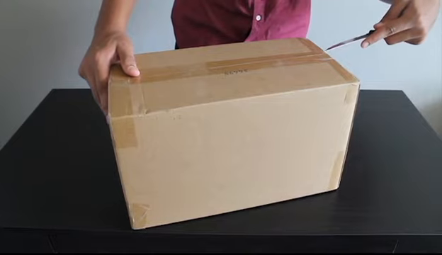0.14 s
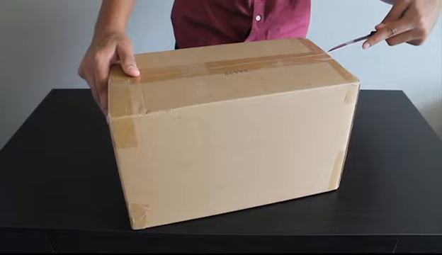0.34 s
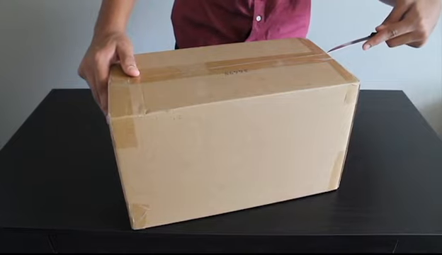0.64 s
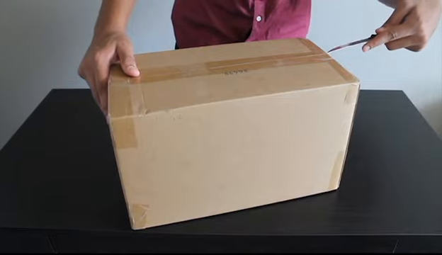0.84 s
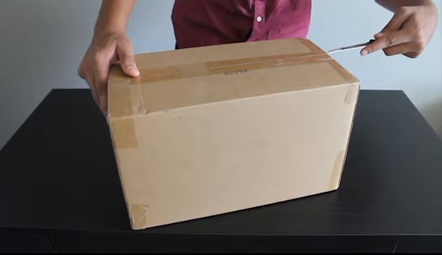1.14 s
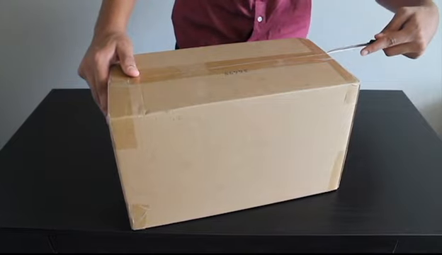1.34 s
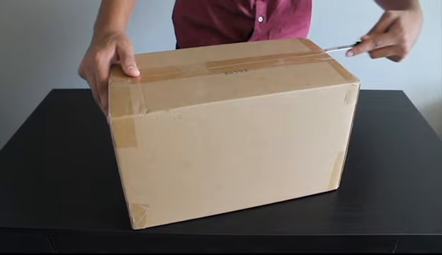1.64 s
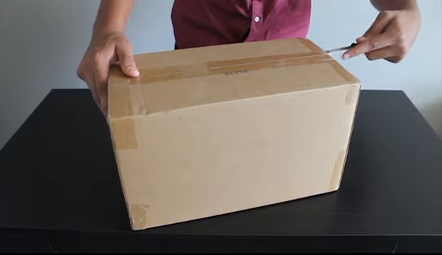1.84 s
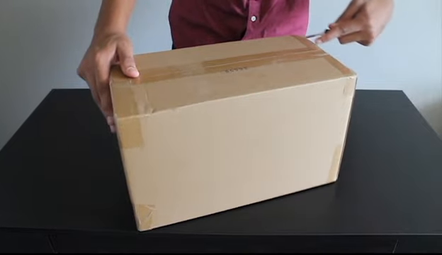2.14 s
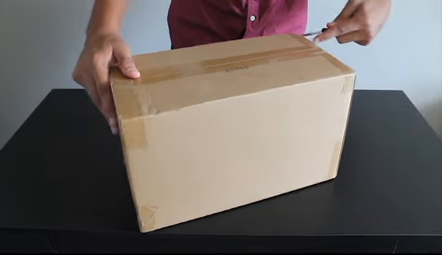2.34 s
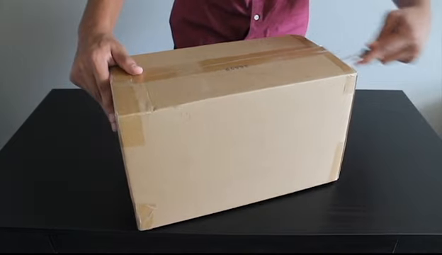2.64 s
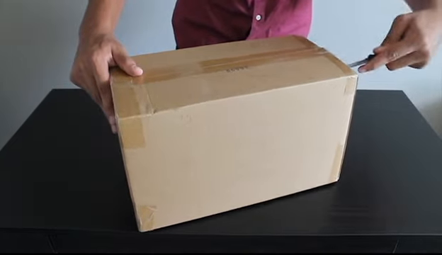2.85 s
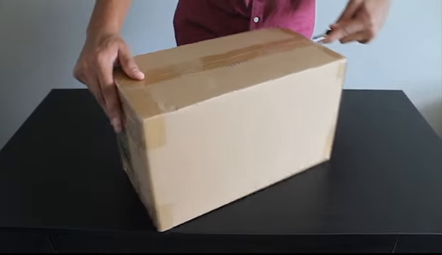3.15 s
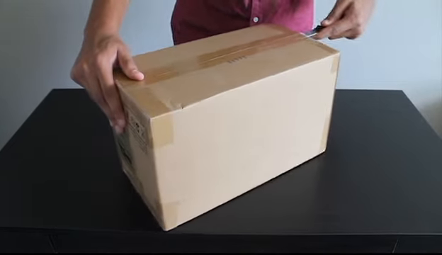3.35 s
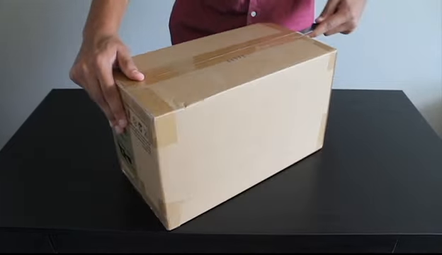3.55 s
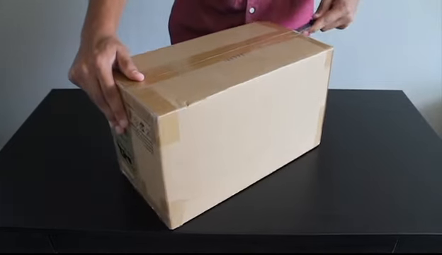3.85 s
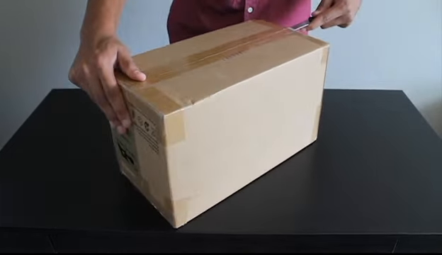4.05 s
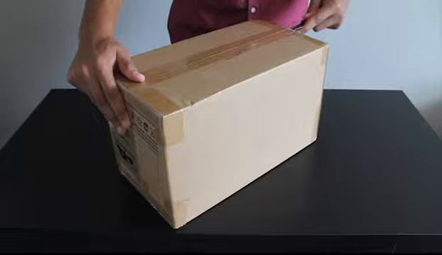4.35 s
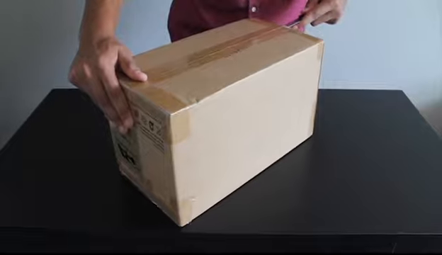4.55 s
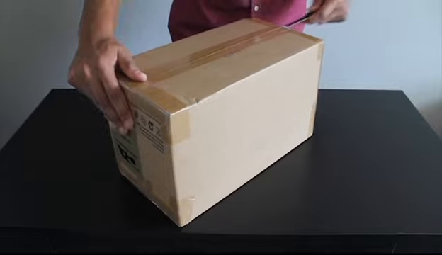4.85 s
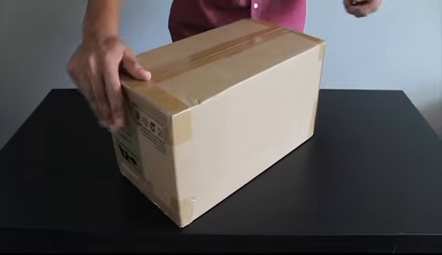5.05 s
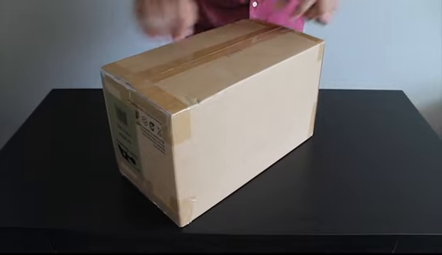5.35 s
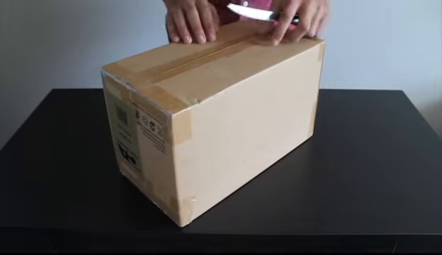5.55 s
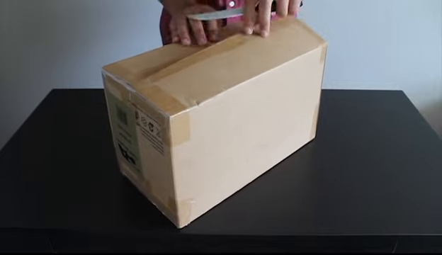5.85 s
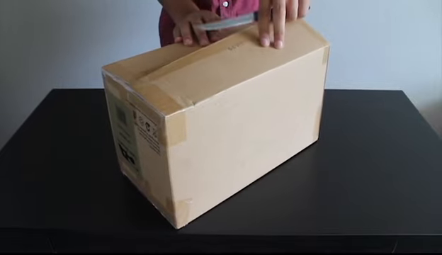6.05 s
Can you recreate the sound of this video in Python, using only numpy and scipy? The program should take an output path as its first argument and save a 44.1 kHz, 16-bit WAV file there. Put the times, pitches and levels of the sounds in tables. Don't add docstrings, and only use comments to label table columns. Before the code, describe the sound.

Sharp tape pops and gritty blade strokes on a cardboard carton, scattered taps, then a loud crack and hollow slap as the flap comes free.

```python
import sys
import numpy as np
from scipy import signal
from scipy.fft import rfft, irfft
from scipy.io import wavfile
from scipy.ndimage import uniform_filter1d

SR = 44100
rng = np.random.default_rng(int(sys.argv[2]) if len(sys.argv) > 2 else 0)


def gain_from_decibels(decibels):
    exponent = np.asarray(decibels, float) / 20
    return 10 ** exponent


def digitize_waveform(pressure):
    field = np.atleast_2d(pressure).T
    bounded = np.clip(field, -1, 1)
    quanta = np.round(bounded * 32767).astype(np.int16)
    wavfile.write(sys.argv[1], SR, quanta)


N = 273420

# peak_s, rise_s, fall_s, pressure_db, tearing_db (over the pressure)
CUTS = [(.605, .04, 0.058, -46, -4), (.672, 0.086, 0.061, -40, -2.5), (1.075, 0.11, 0.25, -48, -6),
        (1.509, 0.038, 0.07, -40, -13), (1.54, 0.067, 0.021, -41, -6.5), (1.624, 0.043, .04, -32.5, -8.5),
        (1.68, 0.032, 0.04, -42, 7.5), (1.73, 0.12, 0.088, -42.5, -25), (1.956, .05, 0.056, -46, 0.5),
        (1.989, .05, 0.031, -40, -10), (3.485, 0.081, 0.11, -48.5, -4), (3.87, 0.074, 0.088, -44.5, -15),
        (5.896, 0.021, 0.077, -47.5, -7)]
# peak_s, rise_s, fall_s, pressure_db, rasp_db (over the pressure)
DRAGS = [(.63, 0.04, 0.042, -55.5, 10), (.965, 0.27, 0.065, -50, -28), (1.95, 0.05, 0.037, -55, 4),
         (2.02, 0.018, 0.058, -36.5, -28), (2.11, 0.099, 0.22, -52, -11), (2.71, 0.21, 0.064, -49.5, -3),
         (3.3, 0.15, 0.094, -47.5, -4.5), (3.488, 0.054, 0.088, -54.5, 9), (4.23, 0.066, 0.062, -53, -16),
         (4.86, 0.14, 0.15, -50.5, -5), (4.935, 0.042, 0.12, -52, 3.5), (5.499, 0.038, 0.033, -39, -12),
         (5.631, 0.045, 0.31, -53.5, -19), (6.02, 0.027, 0.063, -39.5, -25), (6.109, .015, 0.11, -49, -3),
         (6.19, 0.12, 0.079, -49.5, -10)]
# peak_s, level_db
JOLTS = [
    (.59, -39),
    (.678, -38),
    (1.63, -53),
    (2.01, -62),
    (4.486, -47.5),
    (4.81, -45.5),
    (5.59, -45),
]
# peak_s, rise_s, fall_s, hollow_drone_db, panel_hum_db
FLEXES = [
    (.95, .12, 0.064, -51, -70),
    (1.53, 0.061, 0.035, -41.5, -55),
    (1.62, .03, 0.046, -40, -49),
    (1.965, .04, 0.045, -42, -43),
    (3.301, 0.082, .07, -40.5, -59),
    (3.5, .05, 0.12, -48, -54),
    (3.87, 0.071, 0.09, -65, -42),
    (5.07, 0.091, 0.13, -51, -60),
]
# start_s, crack_db, flap_clack_db (over the crack), panel_ring_db (over the crack)
POPS = [(.274, -26, -35, -34), (.568, -12.5, -13.5, -7), (.591, -19, -10, -15), (.671, -25, -20, -4.5),
        (1.999, -28, -14, -21), (2.04, -31.5, -20, -18), (3.921, -32, -16, -20), (4.073, -30.5, -3.5, -18),
        (4.82, -34, -1, -1), (4.887, -36, -2, -2), (4.9, -35.5, 2, 0), (5.757, -38, -9, -9)]
# start_s, force_db, hollowness_db, hardness_db (both over the force)
TAPS = [(1.598, -29.5, 1, -3), (1.613, -39, 8, 5), (1.999, -15, 0.5, -17), (2.039, -54, 5, -15),
        (3.404, -54, 15, 11), (3.913, -41, -25, -15), (4.781, -40.5, 4, -11), (4.813, -32, -16, -9),
        (4.874, -47, -12, 12), (4.923, -23, -18, 3), (4.928, -24.5, -11, -1.5), (5.487, -34.5, 6, 0.5),
        (5.61, -31, -7, -10), (5.71, -38, -22, -7), (5.892, -34.5, -14, -4), (5.999, -39, 18, 12),
        (6.005, -17, 2.5, -26), (6.105, -29.5, -22, -0.5)]
# start_s, panel_ring_db, hollow_boom_db, flap_clack_db, crack_db
SLAPS = [
    (5.2193, -50, -51, -41, -37),
    (5.2422, -15.5, -36, -1, -12.5),
    (5.2452, -3.5, -18.5, -8, -41),
    (5.265, -11.5, -10.5, -4.5, -1.5),
    (5.266, -4.5, -10.5, -0.5, -27),
    (5.2679, -15, -16, -1.5, -30),
    (5.2713, -17, -11, -17, -36),
]
# start_s, level_db, width_s
PUSHES = [
    (5.482, -18, 0.0042),
    (5.494, -24, 0.0063),
]
# start_s, level_db
LANDINGS = [
    (4.928, -28),
    (5.49, -29),
    (5.995, -33),
]

# pitch_hz, level_db, t60_s
HOLLOW = [(284, -1, 0.07), (294, 9, 0.031), (368, -1.5, 0.028), (397.6, -1.5, 0.05), (436, -3.5, 0.068)]
# pitch_hz, level_db, t60_s
PANEL = [(505.5, 4, 0.034), (572, 0, 0.033), (624, -5, 0.044), (737, -13, 0.079), (850, -16, 0.15)]
# pitch_hz, level_db, t60_s
FLAP = [(1230, -16, 0.0046), (1330, -13.5, 0.028), (1570, 4, 0.016), (1606, 3, 0.01), (1827, -1.5, 0.022),
        (2237, -0.5, 0.01), (2452, -4, 0.032)]
# pitch_hz, level_db, t60_s
CRACK = [(3040, 10, 0.0048), (3560, -16, 0.021), (4640, 14.5, 0.0034), (5440, -6, 0.0042),
         (6960, 4.5, 0.0052), (8300, -3.5, 0.0046), (9800, -12, 0.002), (12000, -7, 0.0019),
         (13500, -4, 0.0015)]
# pitch_hz, level_db, t60_s
POP = [(3620, 1, 0.0024), (5000, 7, 0.00064), (8660, 1, 0.00081), (12000, -6, 0.0015), (14900, -3, 0.0013)]
# pitch_hz, level_db, t60_s
TABLE = [(43.5, 4.5, 0.083), (64, -26, 0.1596), (88, -5, 0.12), (153, -1, 0.092)]
# pitch_hz, level_db (per Hz)
FIZZ = [(1180, -48), (2000, -8.5), (3400, -2), (4530, -11.5), (5030, -10.5), (8190, -12), (11000, -10.5),
        (15100, -28), (16000, -30)]
# pitch_hz, t60_s
ROOM = [(60, 0.43), (250, 0.28), (700, 0.46), (2000, 0.37), (6000, 0.43), (14000, 0.18)]
# pitch_hz, level_db (per Hz)
AIR = [(.3, -29), (2.5, 13), (8, 8.5), (22, -5.5), (59, -8.5), (96, -12), (163, -8), (215, -15),
       (410, -17.5), (468, -12), (610, -19), (1000, -18.5), (2500, -24), (14500, -25.5), (16500, -28.5)]
# pitch_hz, level_db (per Hz)
OWN = [(3.5, -16), (8, 2), (240, -13.5), (590, -16.5), (2600, -17.5), (11500, -18), (16500, -19)]
# time_s, pitch_hz
WHINE = [(0, 1164), (0.252, 1015), (.45, 1260), (.65, 1170), (0.901, 1264), (1.2, 1042), (1.601, 1157),
         (1.9, 1290), (2.3, 1330), (2.55, 1213), (2.95, 1194), (3.3, 1294), (3.8, 1283), (4.1, 1244),
         (4.27, 1111), (4.88, 1310), (5.1, 1187), (6.2, 1295)]

STROKE_DROP_DB, ROUND_TOP = -23, 1.23
CUT_RASP_DB, DRAG_FIZZ_DB, STROKE_SHUDDER_DB = -14, -23, -12.5
JOLT_RISE_S, JOLT_FALL_S = 0.04, 0.055
POP_BOOM_DB, POP_THUMP_DB = -5.5, -41
TAP_CRACK_DB, TAP_THUMP_DB = -9, -20.5
SLAP_THUMP_DB = -12.5
CLACK_SENT_DB, CRACK_SENT_DB = -3.5, 0
ECHO_S, ECHO_DB, SECOND_ECHO_DB = 0.062, -14.5, -31
AIR_DB, OWN_DB = -46.5, -56
WHINE_DB, WHINE_JITTER_HZ = -57.5, 34.9
EDGE_HZ = 15950


def evened(x):
    return x / np.sqrt(np.mean(x ** 2) + 1e-20)


def read(points, hz):
    f, value = np.transpose(points)
    return np.interp(np.log(hz + 1), np.log(f + 1), value)


def add(mix, s, sound):
    part = mix[round(s * SR):][:len(sound)]
    part += sound[:len(part)]


def coloured(x, spectrum):
    hz = np.fft.rfftfreq(len(x), 1 / SR)
    return evened(irfft(rfft(x) * gain_from_decibels(read(spectrum, hz)), len(x)))


def ring(modes, detune=0.92):
    longest_s = max(t60 for _, _, t60 in modes)
    t = np.arange(int(SR * longest_s) + SR // 500) / SR
    swing = np.zeros(len(t))
    for (hz, db, t60), shift in zip(modes, detune * np.ones(len(modes))):
        swing += gain_from_decibels(db - 60 * t / t60) * np.sin(2 * np.pi * hz * shift * t) / hz
    speed = np.diff(swing)
    return speed / np.linalg.norm(speed)


def driven(force, modes):
    return signal.oaconvolve(force, ring(modes))[:N]


def slips(per_s, spread_db):
    ticks = (rng.random(N) < per_s / SR) * rng.choice([-1., 1.], N)
    return evened(ticks * gain_from_decibels(spread_db * np.minimum(rng.exponential(1, N), 4)))


def pressure(s, rise_s, fall_s, top_db):
    t = np.arange(N) / SR - s
    away = np.maximum(-t / rise_s, t / fall_s)
    return gain_from_decibels(np.maximum(top_db + STROKE_DROP_DB * away ** ROUND_TOP, -140))


def strokes():
    level = np.zeros((4, N))
    for *shape, tear_db in CUTS:
        layers_db = np.array([[0], [CUT_RASP_DB], [tear_db], [STROKE_SHUDDER_DB]])
        level += pressure(*shape) * gain_from_decibels(layers_db)
    for *shape, rasp_db in DRAGS:
        layers_db = np.array([[0], [rasp_db], [rasp_db + DRAG_FIZZ_DB], [STROKE_SHUDDER_DB]])
        level += pressure(*shape) * gain_from_decibels(layers_db)
    for s, db in JOLTS:
        level[3] += pressure(s, JOLT_RISE_S, JOLT_FALL_S, db)
    level = uniform_filter1d(level, 200, axis=1)
    rub = driven(level[0] * slips(700, spread_db=1.5), HOLLOW + PANEL)
    rasp = driven(level[1] * slips(1500, spread_db=2), FLAP)
    fizz = level[2] * coloured(slips(4000, spread_db=4), FIZZ)
    shudder = driven(level[3] * slips(260, spread_db=6), TABLE)
    return rub + rasp + fizz + shudder


def flexing():
    drone, hum = np.zeros((2, N))
    for s, rise_s, fall_s, drone_db, hum_db in FLEXES:
        drone += pressure(s, rise_s, fall_s, drone_db)
        hum += pressure(s, rise_s, fall_s, hum_db)
    hollow = driven(drone * slips(900, spread_db=1), HOLLOW[:2])
    return hollow + driven(hum * slips(900, spread_db=1), PANEL)


def pops():
    return [(s, db + panel, db + panel + POP_BOOM_DB, db + clack, db, db + panel + POP_THUMP_DB)
            for s, db, clack, panel in POPS]


def taps():
    return [(s, db, db + hollow, db + hard, db + hard + TAP_CRACK_DB, db + TAP_THUMP_DB)
            for s, db, hollow, hard in TAPS]


def slaps():
    return [(*row, row[2] + SLAP_THUMP_DB) for row in SLAPS]


def hit(levels_db, crack, rattle_s, spread, luck):
    panel_db, boom_db, clack_db, crack_db, thump_db = levels_db
    near, far = np.zeros((2, SR // 2))
    parts = ((PANEL, panel_db, 0.0005), (HOLLOW, boom_db, 0.0009),
             (FLAP, clack_db, 0.0002), (TABLE, thump_db, 0.007))
    for modes, db, soft_s in parts:
        blow = np.hanning(int(3 + soft_s * 2 * SR))
        sound = signal.oaconvolve(ring(modes, 1 + spread * luck[:len(modes)]), blow)
        sound = -gain_from_decibels(db) * sound / abs(sound).max()
        add(near, 0, sound)
        add(far, 0, sound * gain_from_decibels(CLACK_SENT_DB * (modes is FLAP)))
    rattle = 0.33 * luck * np.exp(-(np.arange(len(luck)) / SR / rattle_s) ** 2)
    rattle[0] = 1
    rattle[int(0.0012 * SR)] += 0.6
    snap = np.convolve(ring(crack), rattle)
    snap = -gain_from_decibels(crack_db) * snap / abs(snap).max()
    add(near, 0, snap)
    add(far, 0, gain_from_decibels(CRACK_SENT_DB) * ring(POP) * np.linalg.norm(snap))
    return near, far


def blows():
    near, far = np.zeros((2, N))
    kinds = ((pops(), POP, 0.002, 0.015), (taps(), POP, 0.002, 0.015), (slaps(), CRACK, 0.0025, 0.004))
    for rows, crack, rattle_s, spread in kinds:
        for s, *levels_db in rows:
            luck = rng.standard_normal(SR // 100)
            heard, sent = hit(levels_db, crack, rattle_s, spread, luck)
            add(near, s, heard)
            add(far, s, sent)
    return near, far


def palm():
    t = np.arange(N) / SR
    out = np.zeros(N)
    for k, (s, db, width_s) in enumerate(PUSHES):
        out += (-1) ** k * gain_from_decibels(db) * np.exp(-((t - s) / width_s) ** 2 * 4)
    return out


def landings():
    out = np.zeros(N)
    thud = np.convolve(ring(TABLE), np.hanning(SR // 100))
    for s, db in LANDINGS:
        add(out, s, gain_from_decibels(db) * thud / abs(thud).max())
    return out


def wall_echoes(direct):
    out = np.zeros(N)
    add(out, ECHO_S, gain_from_decibels(ECHO_DB) * direct)
    add(out, 2 * ECHO_S, gain_from_decibels(SECOND_ECHO_DB) * direct)
    return out


def room(x):
    echoes = np.zeros(SR)
    at = np.arange(300, SR - 20, 20)
    echoes[at + rng.integers(0, 20, len(at))] = rng.choice([-1., 1.], len(at))
    hz, t, z = signal.stft(echoes, SR, nperseg=256)
    fade = gain_from_decibels(-60 * t / read(ROOM, hz)[:, None])
    tail = signal.istft(z * fade, SR, nperseg=256)[1]
    return signal.oaconvolve(x, tail / np.linalg.norm(tail))[:N]


def room_tone():
    return gain_from_decibels(AIR_DB) * coloured(rng.standard_normal(N), AIR)


def amplifier_hiss():
    return gain_from_decibels(OWN_DB) * coloured(rng.standard_normal(N), OWN) * [[1], [-1]]


def whine():
    jitter = uniform_filter1d(rng.standard_normal(N), size=900)
    jitter = evened(uniform_filter1d(jitter, size=900))
    hz = np.interp(np.arange(N) / SR, *np.transpose(WHINE)) + WHINE_JITTER_HZ * jitter
    return gain_from_decibels(WHINE_DB) * np.sin(2 * np.pi * np.cumsum(hz) / SR) * [[1], [0]]


def scene():
    cut = strokes() + flexing()
    near, far = blows()
    near += palm()
    near += wall_echoes(near)
    reverb = room(gain_from_decibels(-9) * far + gain_from_decibels(-13) * cut)
    return np.tile(cut + near + landings() + reverb + room_tone(), (2, 1))


def low_pass(x):
    return signal.sosfilt(signal.butter(12, 16460, fs=SR, output="sos"), x)


def record(dry):
    mix = dry + amplifier_hiss() + whine()
    limit = signal.firwin(511, EDGE_HZ, fs=SR)[None]
    limited = signal.oaconvolve(mix, limit, "same")
    return low_pass(np.clip(limited, -1, 1))


dry = scene()
out = record(dry)
digitize_waveform(out)
```